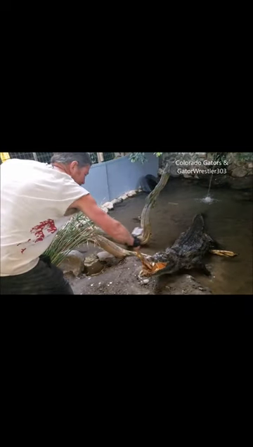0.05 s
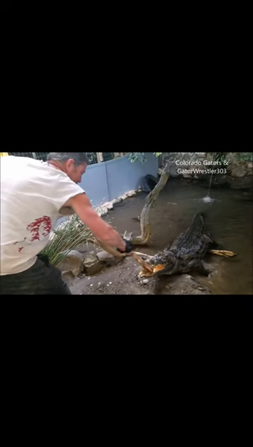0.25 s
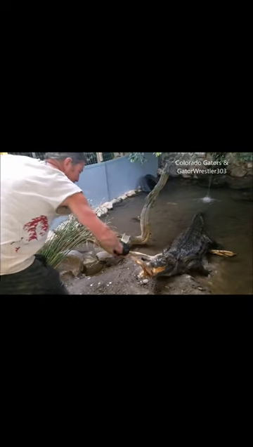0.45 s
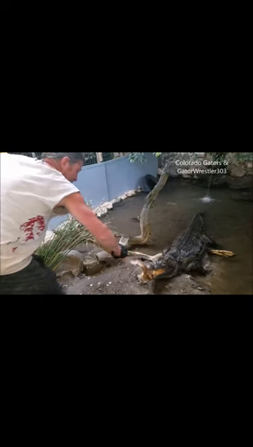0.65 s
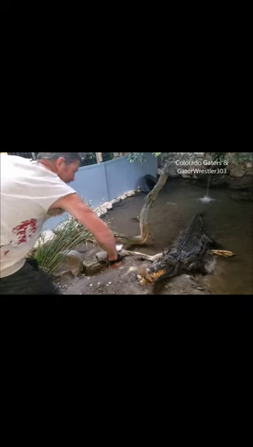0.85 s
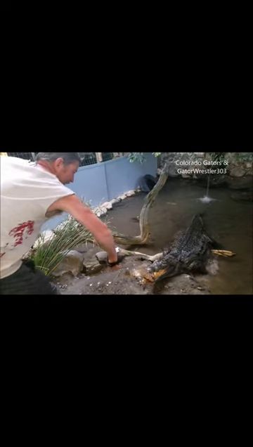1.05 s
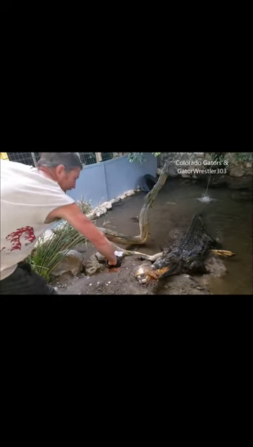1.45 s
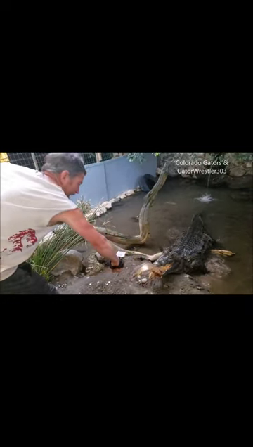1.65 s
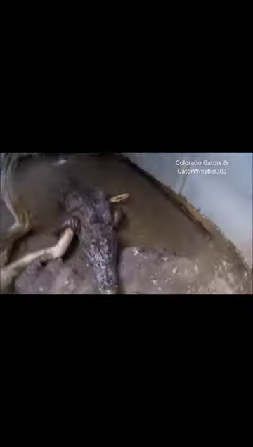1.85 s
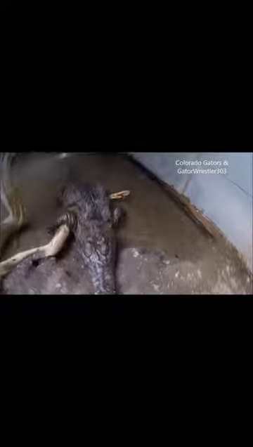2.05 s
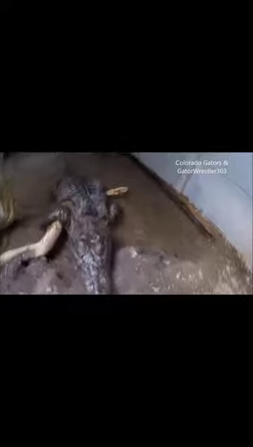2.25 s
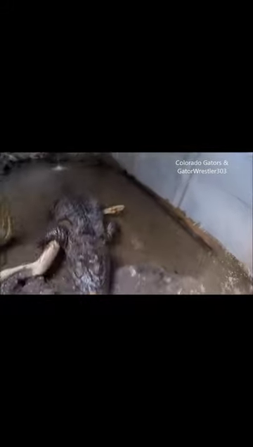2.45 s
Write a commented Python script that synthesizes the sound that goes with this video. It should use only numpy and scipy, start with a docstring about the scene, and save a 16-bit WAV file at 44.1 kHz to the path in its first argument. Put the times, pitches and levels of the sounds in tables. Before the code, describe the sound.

Close, dull crocodile growl swelling over rushing pool water, cut off into a quiet trickle.

```python
"""Crocodile growl at a muddy pool

A crocodile growls, close and dull, at the edge of a walled pool where water rushes in and slops.
Slow pulses ring its throat and chest: the growl swells on a steady pitch, then sinks and turns rough.
At full strength it is cut off along with the pool, leaving a faint, brighter trickle,
a few drips and a low rumble of air."""
import sys
import numpy as np
from scipy import signal
from scipy.fft import rfft, irfft
from scipy.io import wavfile

SR = 44100
rng = np.random.default_rng(int(sys.argv[2]) if len(sys.argv) > 2 else 0)


def master(y):
    """Save y as 16-bit WAV."""
    cut = np.clip(np.atleast_2d(y).T, -1, 1)
    pcm = np.round(cut * 32767)  # scale
    wavfile.write(sys.argv[1], SR, pcm.astype(np.int16))


N = 110250
T = np.arange(N) / SR
F = np.maximum(np.fft.rfftfreq(N, 1 / SR), 1)
SIDES = np.array([[1], [-1]])  # a positive pan leans left

# Throat resonances that open and close: centre_hz, width_hz, gain_db, pan_db
LOW, SECOND = (247, 40, 0.5, -6.5), (334, 81, -1.5, -0.5)
MAIN, HIGH = (421.5, 53, 0.5, -4), (618, 82.5, -1, -0.5)
# Phase by which the growl's left side leads: frequency_hz, lead_rad
LEFT_LEAD = [(254, 2.36), (339, 2.45), (423, .85), (508, 3.73), (592, 1.5), (677, 2), (762, 2.03)]


def amp(db):
    """Decibels to gain."""
    return 10 ** (np.asarray(db) / 20)


def curve(table, column=1):
    """One column of a table, joined over time."""
    rows = np.array(table)
    return np.interp(T, rows[:, 0], rows[:, column])


def across(table, hz):
    """A table joined over log frequency."""
    rows = np.array(table)
    return np.interp(np.log(hz), np.log(rows[:, 0]), rows[:, 1])


def unit(x):
    """Scale to rms 1."""
    return x / np.sqrt(np.mean(x ** 2))


def shape(x, gain):
    """Filter by a gain for each frequency."""
    return irfft(rfft(x) * gain, N)


def noise(likeness):
    """Stereo white noise, from independent sides (0) to mono (1)."""
    likeness = np.clip(likeness, 0, 1)
    mid, side = rng.standard_normal((2, N))
    return unit(shape(mid, np.sqrt(1 + likeness)) + SIDES * shape(side, np.sqrt(1 - likeness)))


def walk(rate_hz):
    """Smooth random wander with rms 1."""
    return unit(shape(rng.standard_normal(N), 1 / (1 + (F / rate_hz) ** 4)))


def resonance(hz, width_hz, db, pan_db=0):
    """Gain of a steep resonance over frequency, on each side."""
    return amp(db + SIDES * pan_db / 2) / (1 + (2 * (F - hz) / width_hz) ** 4) ** .75


def growl():
    """Slow pulses drive the throat and chest, stumbling as the voice roughens."""
    # Pulse rate: time_s, pitch_hz
    pitch = [(.7, 81), (.8, 84.5), (.89, 77.52), (.96, 80.6), (1.03, 83.33), (1.17, 84.56), (1.46, 84.67),
             (1.53, 83.16), (1.58, 81.62), (1.62, 78.53), (1.68, 75.01), (1.71, 73.8), (1.77, 69.15),
             (1.8, 68.22), (1.86, 63.3), (1.91, 59.17)]
    # Drive on the throat: time_s, level_db, roughness (0-1)
    effort = [(.55, -65.5, 0.7), (.72, -39, 0.8), (.84, -32.5, .7), (.92, -23, .4), (1.03, -21.5, .13),
              (1.22, -17.5, 0.01), (1.48, -16.5, .05), (1.565, -17.5, 0.13), (1.61, -19, .3),
              (1.73, -18, 0.4), (1.78, -19, .3), (1.84, -24, .5), (1.89, -19.5, 0.48)]
    # Steady throat resonances: centre_hz, width_hz, gain_db, pan_db
    throat = [(502.5, 71, -7.5, 12), (645, 76, -17.5, -6), (752, 45, -16.5, 11.5), (914, 260, -30, 3),
              (1133, 130, -24.5, 0)]
    # Opening of the other four, relative to the effort: time_s, low_db, second_db, main_db, high_db
    opening = [(.7, -3.5, -2, 11, 0), (.83, -3, -9, -5.5, -2), (.95, -21.5, -2, -15, -7),
               (1.1, -16, 3, -0.5, -4.5), (1.35, -10.5, -0.5, 1.5, -2.5), (1.47, -10, 1, 0, -5.5),
               (1.54, 2.5, -0.5, -0.5, -2), (1.6, -4, 0.5, -7.5, 4), (1.65, -0.5, 4, -9.5, -1),
               (1.69, -16.5, 2.5, -5.5, -16.5), (1.735, -10, 1.5, -3.5, -3), (1.775, 7, -6.5, -13.5, 3.5),
               (1.83, 7, 7.5, -2, -4), (1.885, 9.5, -1, -2, -1.5)]
    # The high resonance slides down into place, then wavers: time_s, offset_hz
    high_slide = [(.72, 237), (.84, 180), (.905, 140), (.95, 28.5), (1.04, -1.5), (1.5, 0), (1.56, 14),
                  (1.66, -12), (1.73, 23), (1.79, 0.5), (1.88, 18.5)]
    # Stereo drift: time_s, pan_db, extra_pan_db (two lowest resonances)
    drift = [(1, -1, 7), (1.3, 0, 3.5), (1.53, -4, -2), (1.65, -3, 11), (1.74, -3.5, 8), (1.8, -2, 13),
             (1.86, -1.5, 0), (1.9, -0.5, 1)]
    rough = np.clip(curve(effort, 2), 0, 1)
    hz = curve(pitch) * (1 + .012 * rough * walk(36))
    cycles = np.cumsum(hz) / SR
    low, second, main, high = (amp(curve(opening, i)) for i in (1, 2, 3, 4))
    slide_hz = curve(high_slide)
    lean = amp(SIDES * curve(drift, 2) / 2)
    formants = [(sum(resonance(*row) for row in throat), 1), (resonance(*LOW), low * lean),
                (resonance(*SECOND), second * lean), (resonance(*MAIN), main)]
    tone = throat_tone(hz, cycles, rough, formants, high, slide_hz)
    breath = amp(4) * rough * rasp(cycles, formants, high, slide_hz)
    boom = chest(cycles)
    voice = pool_walls(amp(curve(effort)) * (tone + breath))
    return amp(SIDES * curve(drift) / 2) * (voice + hollow_note() + boom)


def throat_tone(hz, cycles, rough, formants, high, slide_hz):
    """Overtones of the pulses ring the throat; roughness makes them wobble, shimmer and limp."""
    # Stereo width: time_s, lead_scale
    width = [(.85, 0.28), (1.02, 0.77), (1.42, 1.03), (1.56, 1.03), (1.64, 0.7), (1.76, 0.53)]
    spread = SIDES * curve(width) / 2
    upper = resonance(*HIGH)
    at = lambda band, f: band[:, np.clip(f * N / SR, 0, len(F) - 1).astype(int)]
    scatter_rad, wobble_rad, shimmer_db = 1.1, .55, 6
    tone = 0
    for k in range(3, 15):
        gain = sum(level * at(band, k * hz) for band, level in formants)
        gain = gain + high * at(upper, k * hz - slide_hz)
        phase = 2 * np.pi * k * cycles + scatter_rad * k * k + wobble_rad * rough * k / 7 * walk(15)
        shimmer = amp(shimmer_db * rough * walk(31))
        tone = tone + gain * shimmer * np.cos(phase + spread * across(LEFT_LEAD, k * hz))
    limp = 1 + .4 * rough * np.cos(np.pi * cycles)  # strong and weak pulses alternate
    return tone * limp * np.sqrt(1 - rough ** 2)


def rasp(cycles, formants, high, slide_hz):
    """Air rasps through the throat resonances, one dying puff per pulse."""
    decay_cycles, thin_below_hz = .69, 650
    upper = resonance(*HIGH)
    puffs = noise(likeness=.22) * unit(np.exp(-(cycles % 1) / decay_cycles))
    puffs /= np.sqrt(np.mean(upper ** 2))
    shift = np.exp(2j * np.pi * np.cumsum(slide_hz) / SR)
    sliding = np.real(signal.hilbert(shape(puffs, upper)) * shift)
    low_cut = np.minimum(F / thin_below_hz, 1) ** 2
    return sum(level * shape(puffs, band * low_cut) for band, level in formants) + high * sliding


def chest(cycles):
    """The chest booms at the pulse rate and its octave."""
    # Chest boom: time_s, fundamental_db, octave_db
    boom = [(.6, -56, -47), (.8, -41.5, -43), (1, -34, -30.5), (1.3, -30.5, -35), (1.5, -31, -34),
            (1.58, -31.5, -24), (1.68, -31.5, -49.5), (1.78, -24, -31), (1.9, -28, -30)]
    return sum(amp(curve(boom, k) + walk(13)) * np.cos(2 * np.pi * k * cycles) for k in (1, 2))


def hollow_note():
    """A hollow note at the main resonance holds its pitch while the pulse rate moves."""
    # Swells of the note: time_s, level_db
    swells = [(.68, -60), (.75, -32), (.85, -23.5), (.93, -51), (1.54, -50), (1.585, -15), (1.655, -18),
              (1.69, -31), (1.738, -13.5), (1.8, -33.5), (1.885, -17.5)]
    phase = 2 * np.pi * MAIN[0] * T + .35 * walk(12)
    return amp(curve(swells)) * np.cos(phase + SIDES * across(LEFT_LEAD, MAIN[0]) / 2)


def pool_walls(x, t60_s=.4, wet_db=-13, predelay_s=.012):
    """The pool walls add a short diffuse tail."""
    tail = rng.standard_normal((2, N)) * amp(-60 * T / t60_s) * (T > predelay_s)
    tail /= np.sqrt(np.sum(tail ** 2, axis=1, keepdims=True))
    return x + amp(wet_db) * signal.fftconvolve(x, tail, axes=1)[:, :N]


def rush():
    """Water pours in: a churning roar whose bands flicker, with bubbles in it."""
    # Colour of the roar: frequency_hz, relative_db
    spectrum = [(20, -11), (40, -7), (75, 0), (130, -8), (220, -1.5), (420, -5), (750, -6), (1100, -15),
                (2000, -21.5), (3100, -15.5), (3800, -23.5), (5000, -29.5)]
    # Strength of the flow: time_s, level_db
    flow = [(0, -26), (.15, -26), (.3, -25), (.5, -25), (.9, -26), (1.4, -27), (1.9, -29.5)]
    # Likeness of left and right: frequency_hz, likeness (clipped to 0-1)
    likeness = [(60, 1.36), (100, 0.5), (160, 0.52), (250, 0.3), (400, -2), (5000, 0)]
    # Placement of the roar: frequency_hz, pan_db
    pan = [(100, 1), (700, 1.5), (1500, 9.5), (2600, -3.5), (4200, 4)]
    colour = amp(across(spectrum, F) + SIDES * across(pan, F) / 2)
    roar = unit(shape(noise(across(likeness, F)), colour))
    edges_hz = [0, 150, 400, 900, 2000, SR]
    churn = sum(shape(roar, (F >= a) & (F < b)) * amp(walk(22)) for a, b in zip(edges_hz, edges_hz[1:]))
    return churn * amp(curve(flow)) + amp(-46) * bubbles()


def slops(attack_s=.0005):
    """Short wet slaps at the muddy edge."""
    # Slaps of water: start_s, level_db, centre_hz, width_hz, decay_s, pan_db
    slaps = [(0.251, -24, 3600, 2610, 0.02, 1.5), (0.255, -22, 1000, 1580, 0.019, 0.5),
             (.276, -29.5, 3000, 4200, 0.15, 5), (.356, -20, 800, 900, 0.0044, -4),
             (0.372, -19.5, 950, 1300, 0.009, -0.5), (0.393, -20, 790, 1800, 0.0025, 4),
             (1.586, -21, 650, 500, .012, -1)]
    out = 0
    for start, db, hz, width, decay, pan in slaps:
        age = np.maximum(T - start, 0)
        envelope = (1 - np.exp(-age / attack_s)) * np.exp(-age / decay)
        splash = unit(shape(noise(likeness=.043), resonance(hz, width, 0)))
        out = out + amp(db + SIDES * pan / 2) * envelope * splash
    return out


def drops():
    """Single pockets of air swell and ring in the water."""
    # Gurgles and drips: start_s, level_db, pitch_hz, length_s
    pockets = [(.2, -52, 240, 0.14), (.355, -17.5, 720, .007), (.369, -22, 790, .008),
               (0.664, -27.5, 201.9, 0.14), (2.062, -46, 3600, .016), (2.129, -38, 2470, 0.0098),
               (2.16, -42, 2920, 0.011), (2.25, -46, 1610, .014), (2.284, -57, 359, 0.058)]
    out = 0
    for start, db, hz, length in pockets:
        swell = np.sin(np.pi * np.clip((T - start) / length, 0, 1))
        out = out + amp(db) * swell * np.sin(2 * np.pi * hz * T)
    return out


def bubbles(per_s=250, ring_cycles=5.2):
    """Many small bubbles, each a short rising ring somewhere in the pool."""
    out = np.zeros((2, N))
    for when, pitch, size, place in rng.random((int(per_s * N / SR), 4)):
        hz, start = 300 * 12 ** pitch, int(when * N)
        age = T[:min(N - start, 3000)] * hz / ring_cycles
        ring = np.sin(2 * np.pi * ring_cycles * age * (1 + .018 * age)) * np.exp(-2 * age)
        out[:, start:start + len(ring)] += amp(8.5 * size) * ring * np.array([[place], [1 - place]])
    return unit(out)


def trickle(level_db=-46.5):
    """A faint thread of water wavers and flutters, in mono."""
    # Colour of the trickle: frequency_hz, relative_db
    spectrum = [(100, 0.5), (250, -8), (600, -8.5), (1000, -4), (1600, 4), (2600, 4.5), (3250, -.5),
                (3620, 7), (4050, 2.5), (4400, -5.5), (5000, -2), (5700, -13.5), (6400, -10), (6850, -1.5),
                (7300, -16), (7800, -14), (8100, -6), (8450, -14), (10500, -15.5), (12000, -24.5),
                (15000, -28)]
    water = unit(shape(noise(likeness=1), amp(across(spectrum, F))))
    return water * amp(level_db + .57 * walk(2.7) + .77 * walk(30))


def air_rumble(level_db=-35.5):
    """Moving air rumbles on the microphone, in mono."""
    # Colour of the rumble: frequency_hz, relative_db
    spectrum = [(8, -2.5), (14, 3.5), (22, 2), (40, -12.5), (60, -25), (100, -33.5), (200, -53.5),
                (1000, -104)]
    return amp(level_db) * unit(shape(noise(likeness=1), amp(across(spectrum, F))))


def scene():
    """A hard cut from the loud, dull poolside to the quiet trickle; drops fall on both sides of it."""
    cut_s, dull_hz = 1.908, 5000
    poolside = growl() + rush() + slops()
    quiet = trickle() + air_rumble()
    before_cut = np.clip((cut_s - T) / .002, 0, 1)
    low_pass = np.clip((dull_hz - F) / 80 + 1, 0, 1)
    return shape(poolside * before_cut, low_pass) + quiet * (1 - before_cut) + drops()


def record(dry, top_hz=15300):
    """A steep low-pass takes off the very top."""
    return signal.sosfilt(signal.ellip(8, .2, 70, top_hz, fs=SR, output="sos"), dry)


dry = scene()
out = record(dry)
master(out)
```